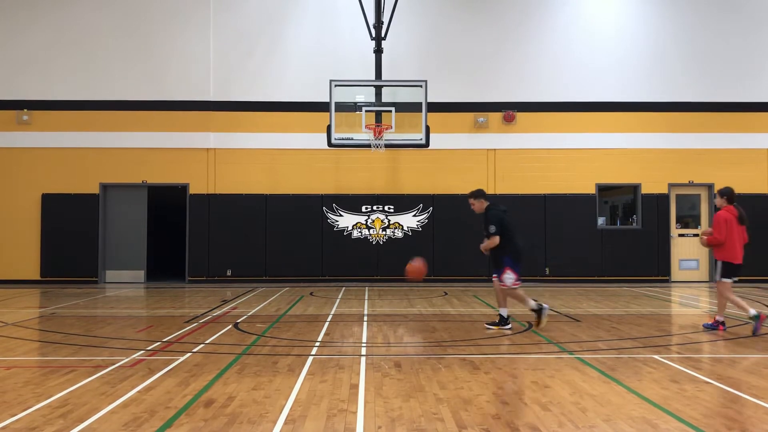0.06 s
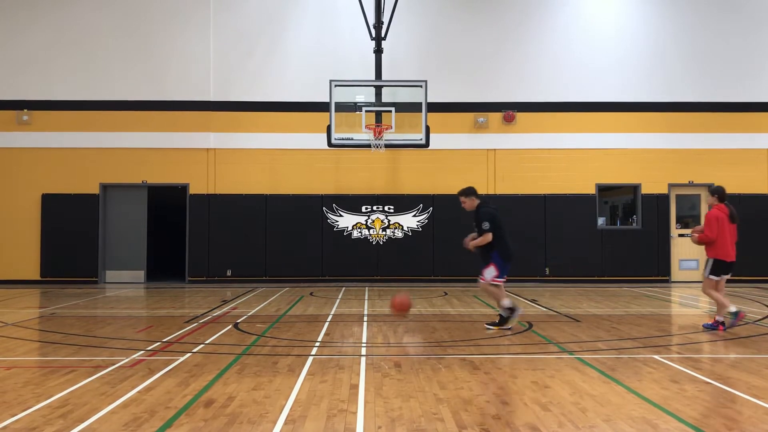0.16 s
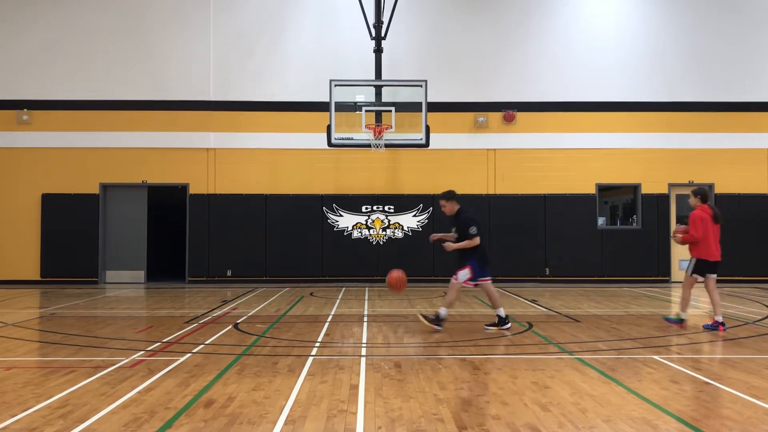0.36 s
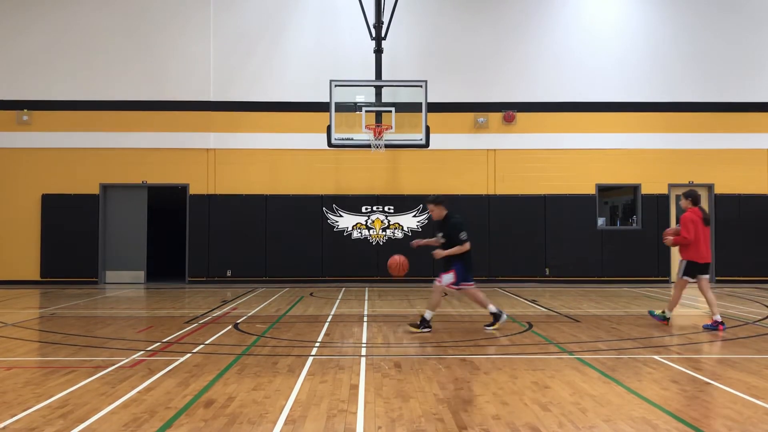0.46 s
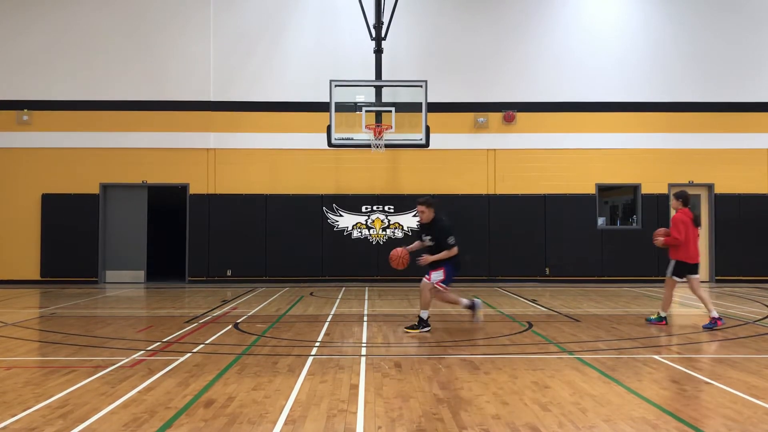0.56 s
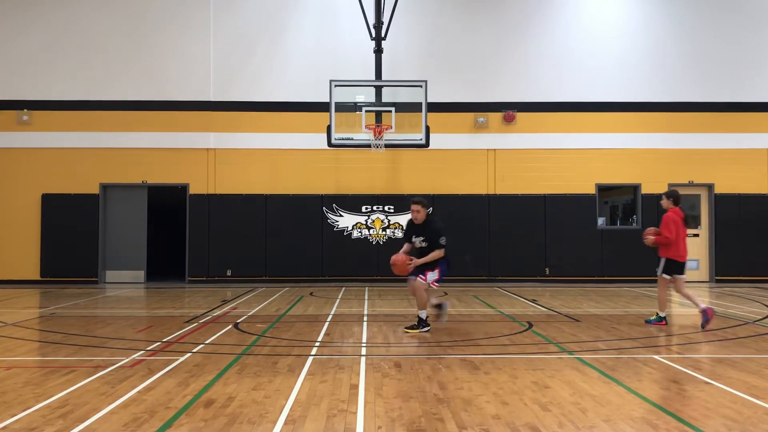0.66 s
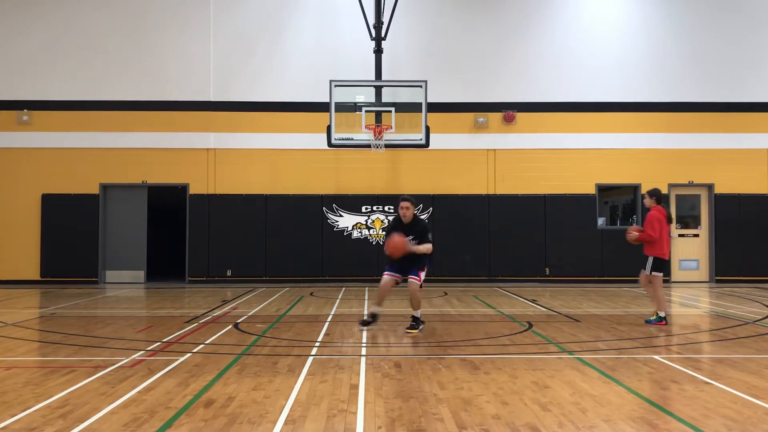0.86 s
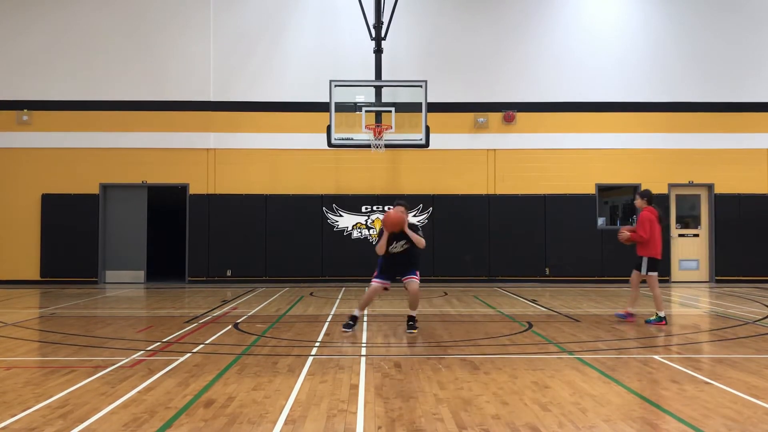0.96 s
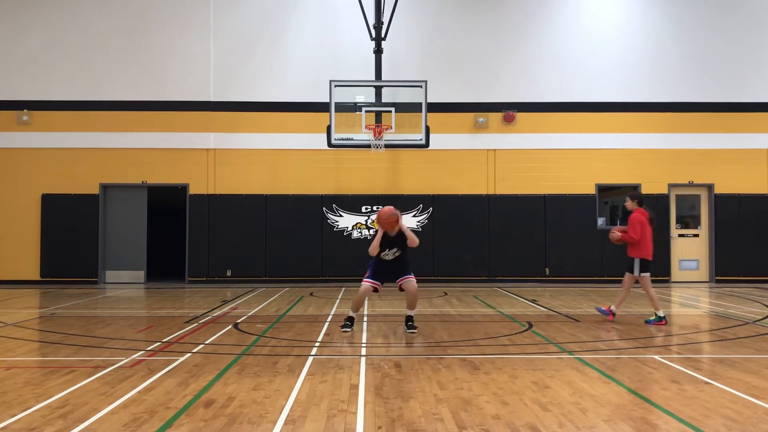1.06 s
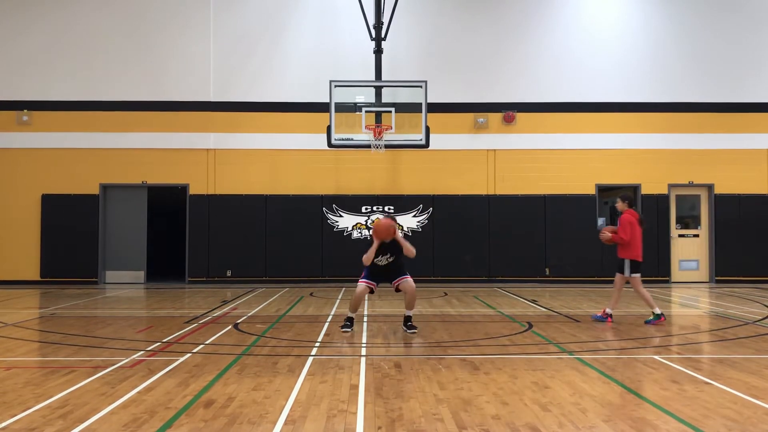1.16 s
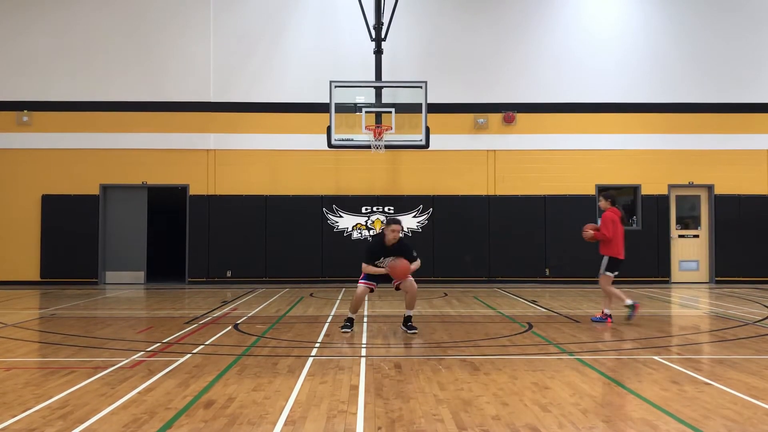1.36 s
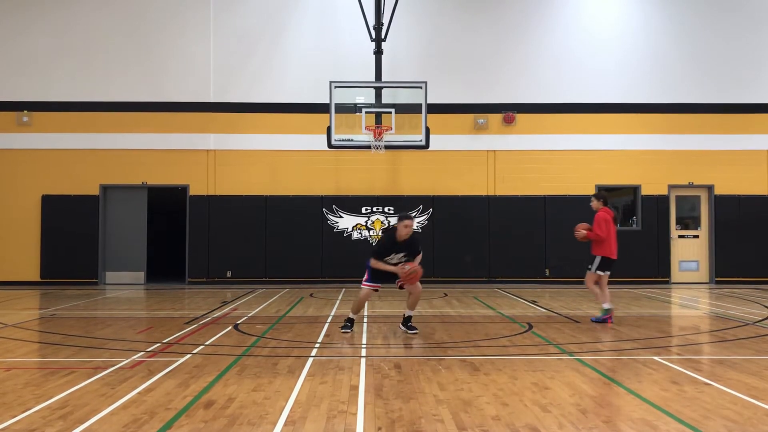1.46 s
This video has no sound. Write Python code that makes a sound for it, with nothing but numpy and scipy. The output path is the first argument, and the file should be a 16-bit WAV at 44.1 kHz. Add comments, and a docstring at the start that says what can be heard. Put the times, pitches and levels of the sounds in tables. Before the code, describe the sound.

A single basketball bounce slaps the floorboards and echoes around a large gym, heard from a few metres off. The player then catches the ball and steps, with dull thuds and a tiny shoe squeak, while ventilation hums quietly.

```python
"""In a large gym, a basketball bounces once on the springy wooden floor, a few metres away.
The rubber slaps, the boards boom, and the ball's skin and the air inside it ring with a ping.
The player gathers the ball and steps, with soft knocks, scuffs and faint squeaks of the shoes.
The walls throw back a few sharp echoes, then a long wash of sound. The ventilation hums throughout."""
import sys
import numpy as np
from scipy import signal
from scipy.fft import rfft, irfft
from scipy.io import wavfile

SR = 44100
rng = np.random.default_rng(int(sys.argv[2]) if len(sys.argv) > 2 else 0)


def to_wav(sig):
    """Store sig (one row per channel, or 1-D mono) as 16-bit WAV at the path in sys.argv[1].

    Samples outside -1..1 are clipped; the rate is SR.
    """
    pcm = np.clip(np.atleast_2d(sig), -1, 1) * 32767
    pcm = np.round(pcm).astype(np.int16)
    wavfile.write(sys.argv[1], SR, pcm.T)  # frames by channels


N = 66150
T = np.arange(N) / SR
HZ = np.fft.rfftfreq(2 * N, 1 / SR)


# Tone of rubber hitting wood: frequency_hz, gain_db
SLAP_TONE = [(200, -23.5), (450, -12), (830, -8.5), (1200, 1), (1520, -7), (1750, -4), (2300, -10),
             (3600, -8.5), (4400, -18.5), (8500, -21.5), (10000, -24.5), (15000, -19)]
# Low notes of the floorboards: pitch_hz, level_db, fade_s (time to fall by 60 dB)
BOARD_NOTES = [(73.3, -25, 0.15), (99.4, -14.5, 0.12), (122.8, -9.5, 0.094), (177.3, -20, 0.12),
               (247.6, -25.5, 0.13), (330.6, -34.5, 0.14)]
# Notes of the ball's skin and the air inside it: pitch_hz, level_db, fade_s
BALL_NOTES = [(435, -38, 0.14), (566.5, -32, 0.036), (751.4, -35, 0.04), (968, -51, 0.43),
              (1160, -40, 0.021), (1156, -63, 0.27), (1284, -60, 0.5), (1437, -66, 0.39),
              (1720, -61.5, 0.2), (2880, -61, 0.28)]
def bounce(start_s=.219, slap_db=7, buzz_db=-10.5, boom_rise_s=0.0052, bass_edge_hz=69.4):
    """The rubber slaps and buzzes as it flattens on the floor; the boards and the ball ring."""
    blow = signal.unit_impulse(N) + amp(buzz_db) * puff(fade_s=.025)
    slap = amp(slap_db) * shape_tone(blow, curve(SLAP_TONE, HZ))
    boom = ring(BOARD_NOTES) * (1 - np.exp(-T / boom_rise_s))
    ping = ring(BALL_NOTES)
    bass_cut_db = -10 * np.log10(1 + (bass_edge_hz / (HZ + 10)) ** 10)
    out = np.zeros(N)
    add(out, start_s, shape_tone(slap + boom + ping, bass_cut_db))
    return out


# Soft knocks of hands and feet: start_s, level_db
KNOCK_HITS = [(0.564, 4.5), (0.667, -7), (1.09, -7), (1.32, -12)]
# Their dull tone: frequency_hz, gain_db
KNOCK_TONE = [(40, -2), (85, 24.5), (180, 20), (330, -25.5), (450, 6), (800, -20.5), (1400, -5.5),
              (4000, -40.5), (12000, -43)]
def knocks(gain_db=-10):
    """Hands meet the ball and feet meet the floor, each with a short, dull thud."""
    out = np.zeros(N)
    for start_s, level_db in KNOCK_HITS:
        add(out, start_s, amp(level_db + gain_db) * puff(fade_s=0.029))
    return shape_tone(out, curve(KNOCK_TONE, HZ))


# Brushes of soles and palms: start_s, length_s, level_db
SCUFF_STROKES = [(0.661, 0.04, -71), (0.757, 0.25, -79.5), (0.927, 0.089, -71)]
# Tone of their hiss: frequency_hz, gain_db
SCUFF_TONE = [(1000, 18.5), (5000, 0.5), (8500, 4), (15000, 1.5)]
def scuffs():
    """Soles and palms brush with a hiss that swells quickly and fades more slowly."""
    hiss = np.zeros(N)
    for start_s, length_s, level_db in SCUFF_STROKES:
        swell = np.sin(np.pi * np.sqrt(np.minimum(T / length_s, 1)))
        add(hiss, start_s, amp(level_db) * swell * rng.standard_normal(N))
    return shape_tone(hiss, curve(SCUFF_TONE, HZ))


# Squeaks of the soles: start_s, length_s, pitch_hz, level_db
SOLE_SQUEAKS = [(.001, 0.0066, 2260, -63), (1.148, 0.023, 1344, -63.5)]
def squeaks(pitch_wobble=.09):
    """A sole sticks and slips on the floor, making a short note with a shaky pitch."""
    out = np.zeros(N)
    for start_s, length_s, pitch_hz, level_db in SOLE_SQUEAKS:
        cycles = np.cumsum(pitch_hz * (1 + pitch_wobble * drift(rate_hz=820))) / SR
        swell = np.sin(np.pi * np.minimum(T / length_s, 1))
        add(out, start_s, amp(level_db) * swell * np.sin(2 * np.pi * cycles))
    return out


# Sharp echoes from nearby surfaces: delay_s, level_db, treble_edge_hz
NEAR_ECHOES = [(.012, -13, 4000), (.0372, -11, 10000), (.0466, -12, 3800), (.047, -20, 15000),
               (.060, -13, 3200), (.0663, -20, 12000), (.089, -17, 3000)]
# The boom coming back from the far walls and the roof: delay_s, level_db
FAR_ECHOES = [(0.108, -7), (0.191, -5.5), (0.344, -9), (.405, -6.5), (0.547, -15.5), (0.643, -17.5),
              (0.878, -21.5)]
def echoes(far_edge_hz=133):
    """Surfaces send the sound back late and duller; from the far ones only the bass returns."""
    out = np.zeros(N)
    for delay_s, level_db, treble_edge_hz in NEAR_ECHOES:
        add(out, delay_s, amp(level_db) * dull_click(treble_edge_hz))
    for delay_s, level_db in FAR_ECHOES:
        add(out, delay_s, amp(level_db) * dull_click(far_edge_hz))
    return out


def scatter(level_db=-9.5, echoes_per_s=6100, rise_s=0.0013, fade_s=0.49, treble_edge_hz=7000):
    """The nearby floor and walls scatter the sound into a burst of tiny echoes."""
    signs = np.sign(rng.standard_normal(N))
    arrivals = rng.random(N) < echoes_per_s / SR
    treble_cut_db = -10 * np.log10(1 + (HZ / treble_edge_hz) ** 2)
    burst = shape_tone(signs * arrivals * amp(-60 * T / fade_s), treble_cut_db)
    return amp(level_db) * burst * (1 - np.exp(-T / rise_s)) / np.linalg.norm(burst)


# Sound lingering in the hall: frequency_hz, level_db, fade_s
WASH_BANDS = [(63, 2.5, 5.2), (127, -2, 1.67), (245, -0.5, 3.1), (596, 0.5, 2.3), (1030, -2, 1.8),
              (1420, 3.5, 1.94), (1910, 0.5, 2.53), (2630, -1, 2.54), (3750, -2, 2.45), (5940, -1, 1.67),
              (8900, -9, 1.25), (15000, -21, 0.28)]
def wash(rise_s=0.047):
    """Countless echoes blur into a long wash whose treble dies first."""
    bands = np.array(WASH_BANDS)
    hz, time_s, noise = signal.stft(rng.standard_normal(N), SR, nperseg=1024)
    level_db = curve(bands[:, [0, 1]], hz)[:, None]
    fade_s = curve(bands[:, [0, 2]], hz)[:, None]
    balance = np.sqrt(2 * np.log(1000) / (fade_s * SR))  # a longer fade adds no extra energy
    fading = noise * amp(level_db - 60 * time_s / fade_s) * balance
    tail = signal.istft(fading, SR, nperseg=1024)[1][:N]
    return tail * (1 - np.exp(-T / rise_s))


def gym(sound, delay_s=.0245):
    """The room answers each sound with single echoes, a burst of scatter and a long wash."""
    response = echoes()
    add(response, delay_s, scatter() + wash())
    return sound + signal.fftconvolve(sound, response)[:N]


# Tone of the moving air: frequency_hz, gain_db
AIR_TONE = [(20, -31), (40, -24), (65, 2.5), (140, -0.5), (220, -7), (320, -15), (450, -22.5), (560, -24.5),
            (750, -28.5), (1150, -32.5), (3800, -38.5), (8000, -45.5), (15500, -50.5)]
# Notes of the fan's hum: pitch_hz, level_db
FAN_NOTES = [(72, -61.5), (210, -61.5), (533, -72)]
def ventilation(air_db=-52.5, waver_depth=0.38):
    """Air rumbles and hisses steadily while the fan's hum wavers in loudness."""
    air = irfft(rfft(rng.standard_normal(2 * N)) * amp(curve(AIR_TONE, HZ)))[:N]
    out = amp(air_db) * unit(air)
    for pitch_hz, level_db in FAN_NOTES:
        waver = 1 + waver_depth * drift(rate_hz=7.3)
        hum = np.sin(2 * np.pi * (pitch_hz * T + rng.random()))
        out += amp(level_db) * unit(waver * hum)
    return out


def amp(db):
    """Turns decibels into a multiplier."""
    return 10 ** (np.asarray(db) / 20)


def unit(x):
    """Scales a signal to an average (rms) level of one."""
    return x / np.sqrt(np.mean(x ** 2) + 1e-20)


def curve(points, hz):
    """Joins a table's points with straight lines on a log-frequency axis."""
    point_hz, values = np.transpose(points)
    return np.interp(np.log(hz + 1), np.log(point_hz + 1), values)


def add(mix, start_s, sound):
    """Mixes a sound in at the given time."""
    part = mix[max(round(start_s * SR), 0):][:len(sound)]
    part += sound[:len(part)]


def shape_tone(x, gain_db):
    """Turns each frequency up or down without smearing the sound earlier in time."""
    log_gain = np.log(amp(np.r_[gain_db, gain_db[-2:0:-1]]))
    response = np.exp(np.conj(signal.hilbert(log_gain)))[:len(HZ)]
    return irfft(rfft(x, 2 * N) * response)[:len(x)]


def drift(rate_hz):
    """A smooth random wobble."""
    return unit(irfft(rfft(rng.standard_normal(2 * N)) * np.exp(-(HZ / rate_hz) ** 2))[:N])


def ring(notes):
    """Fading pure notes set off by one blow."""
    return sum(amp(db - 60 * T / fade_s) * np.sin(2 * np.pi * hz * T) for hz, db, fade_s in notes)


def puff(fade_s):
    """A fading burst of noise with a total energy of one."""
    noise = rng.standard_normal(N) * amp(-60 * T / fade_s)
    return noise / np.linalg.norm(noise)


def dull_click(edge_hz):
    """A click that has lost its treble above the edge."""
    return shape_tone(signal.unit_impulse(N), -10 * np.log10(1 + (HZ / edge_hz) ** 6))


def scene():
    """Ball and player in the gym, over the ventilation, in one channel."""
    return (gym(bounce() + knocks() + scuffs() + squeaks()) + ventilation())[None]


def record(dry, treble_edge_hz=15900):
    """Cuts away the very highest treble."""
    treble_cut = signal.firwin(511, treble_edge_hz, window=("kaiser", 9), fs=SR)
    return signal.oaconvolve(dry, treble_cut[None], "same")


dry = scene()
out = record(dry)
to_wav(out)
```